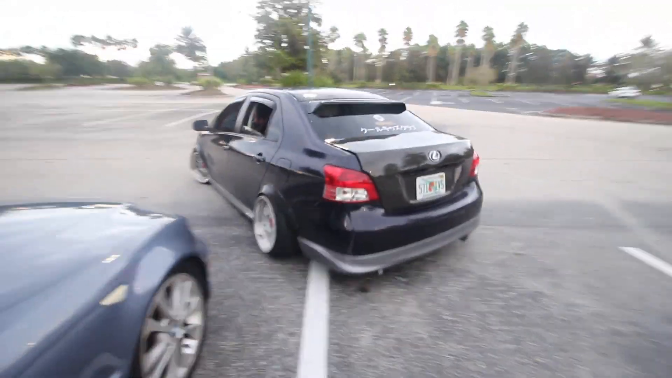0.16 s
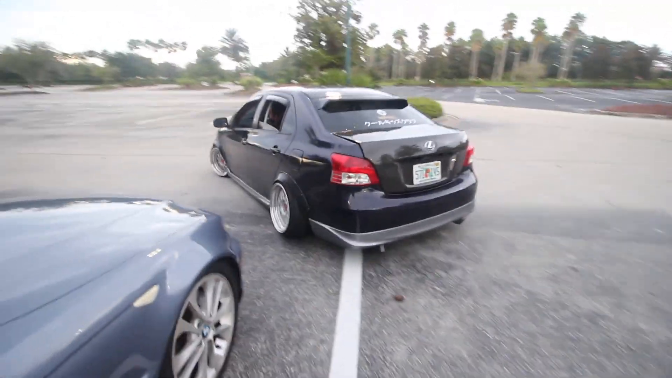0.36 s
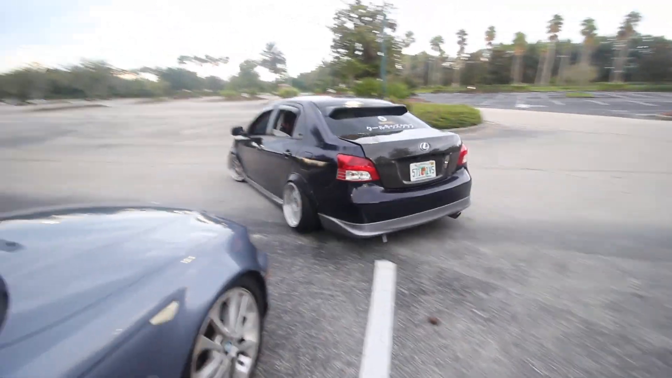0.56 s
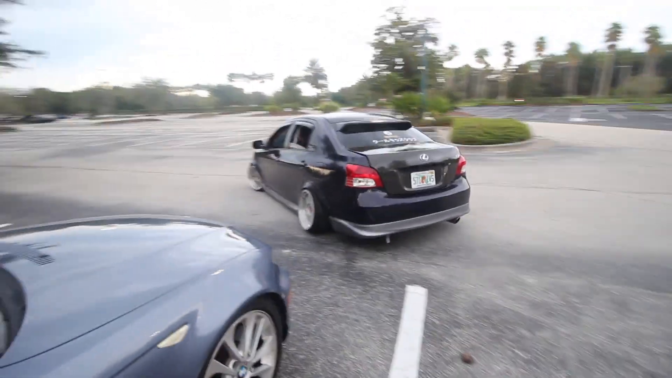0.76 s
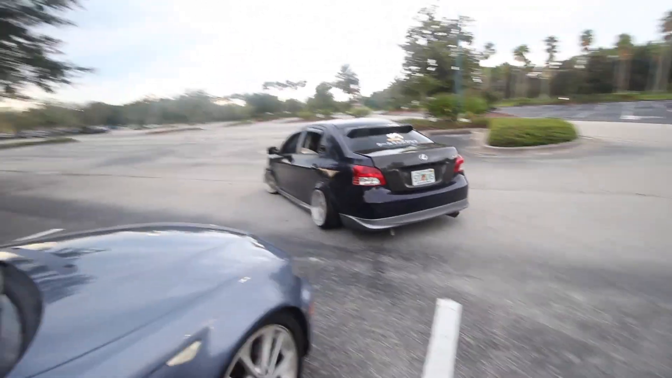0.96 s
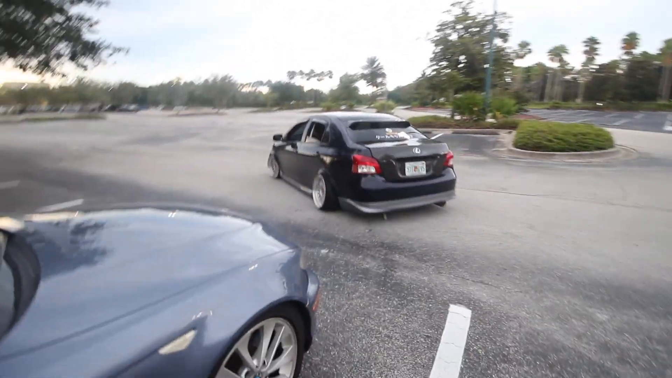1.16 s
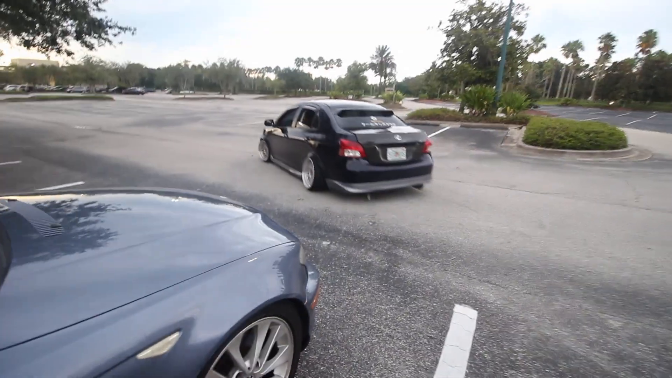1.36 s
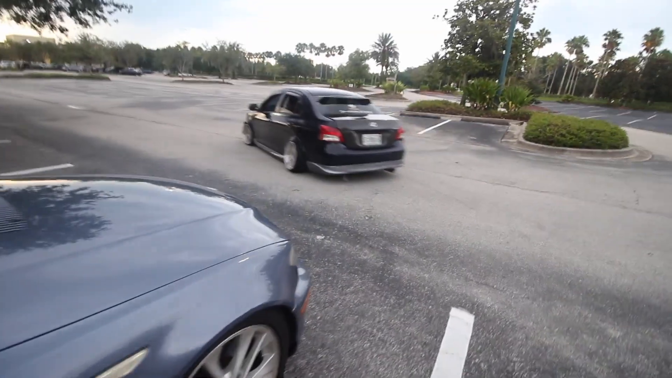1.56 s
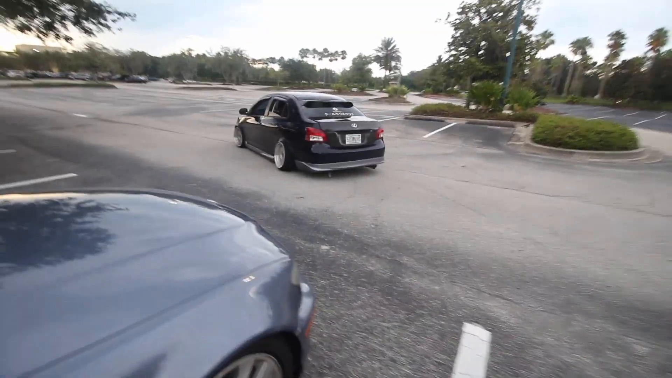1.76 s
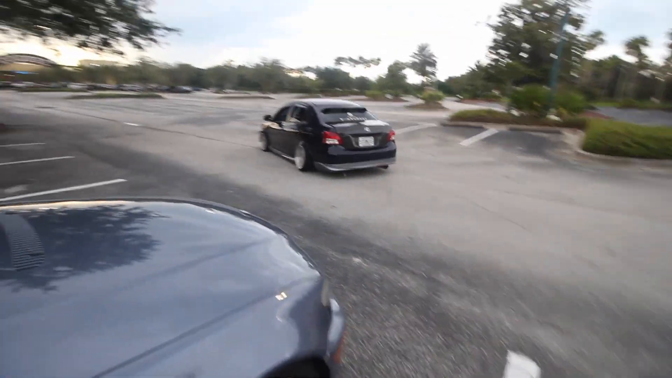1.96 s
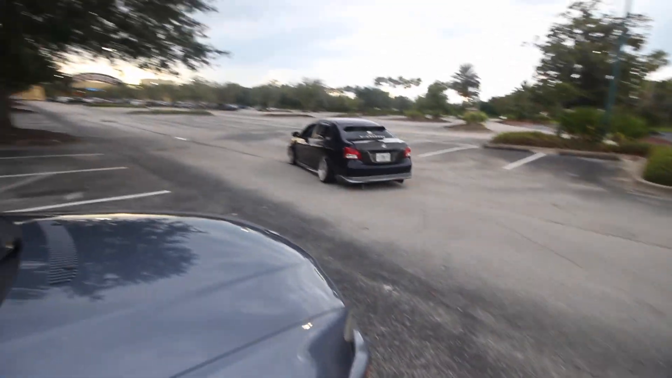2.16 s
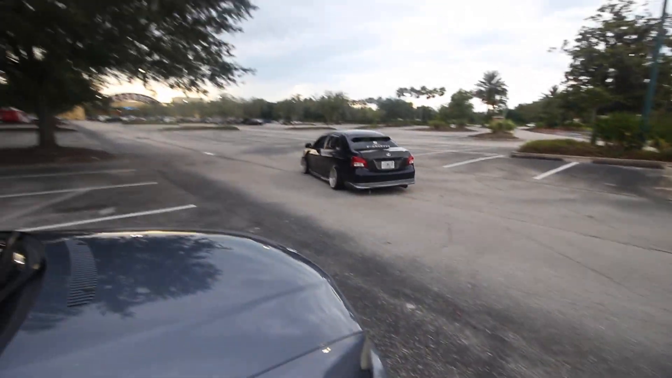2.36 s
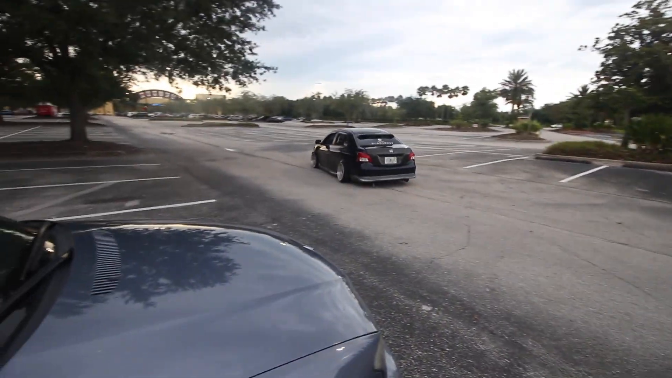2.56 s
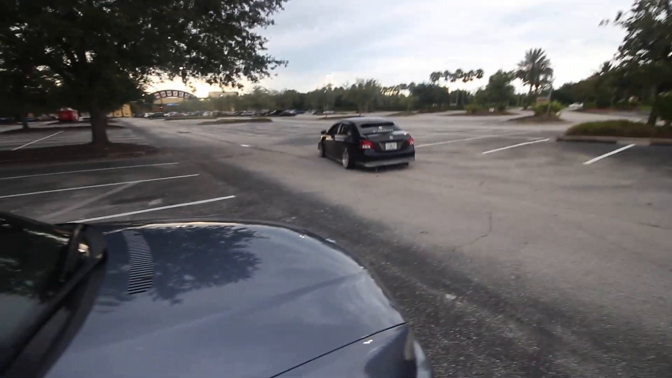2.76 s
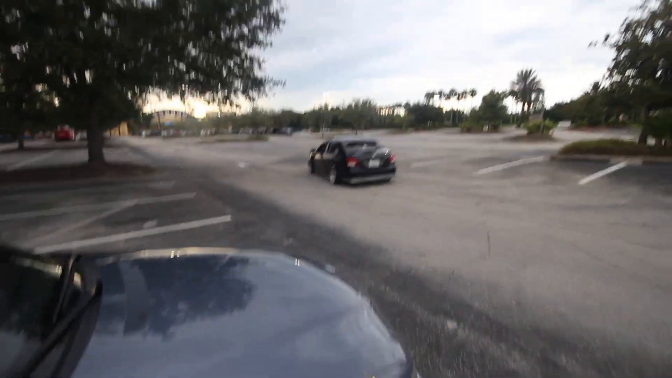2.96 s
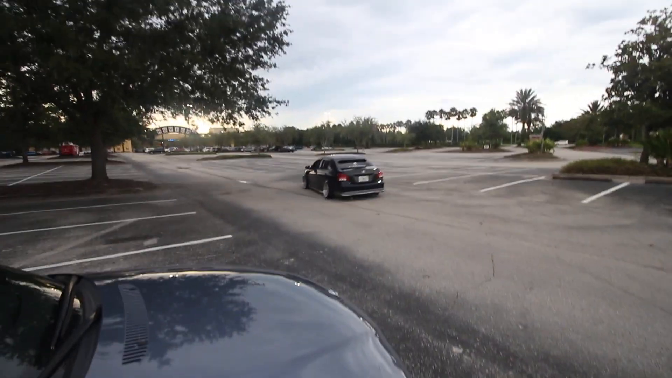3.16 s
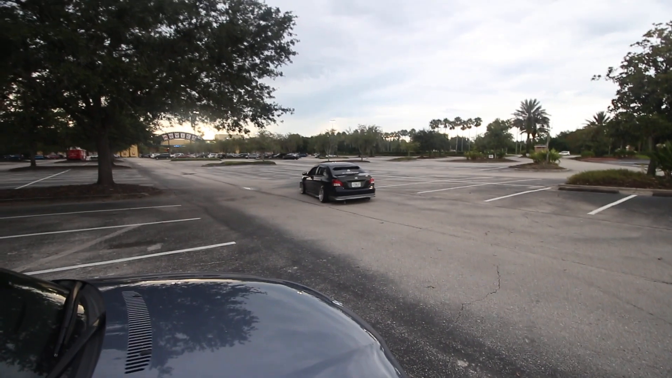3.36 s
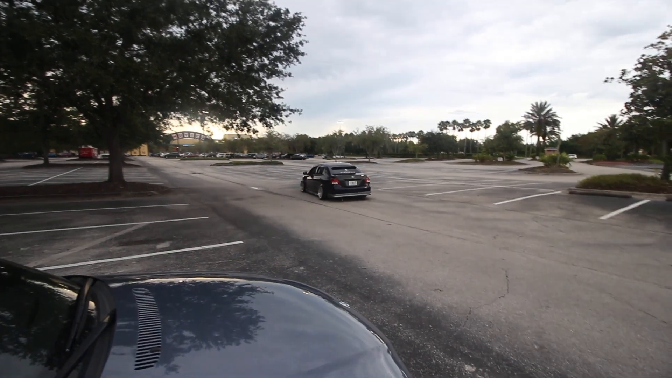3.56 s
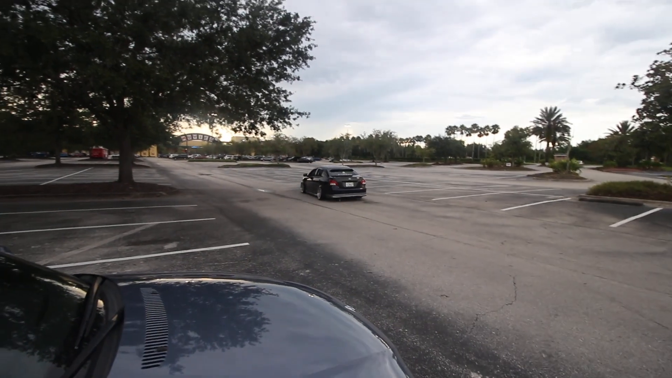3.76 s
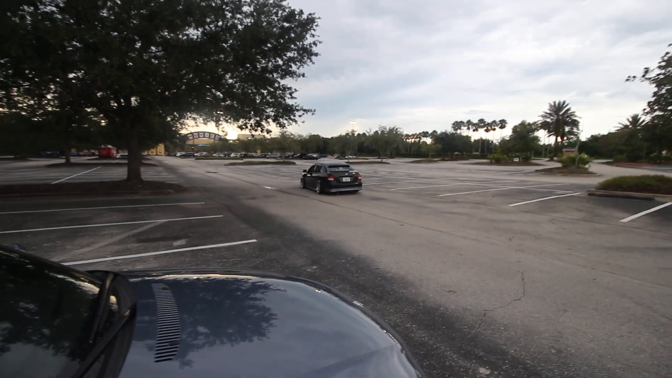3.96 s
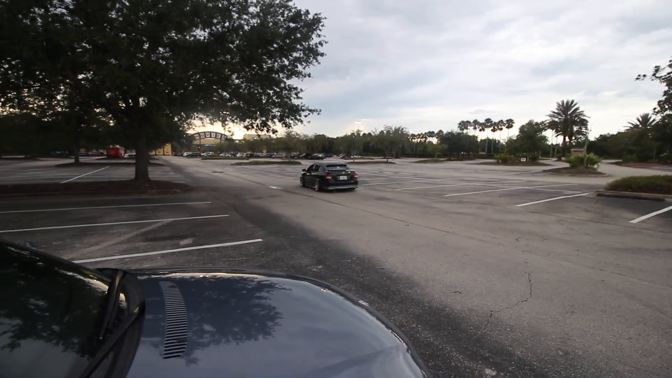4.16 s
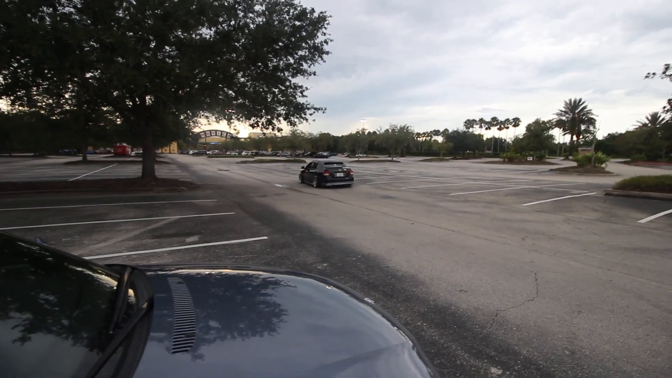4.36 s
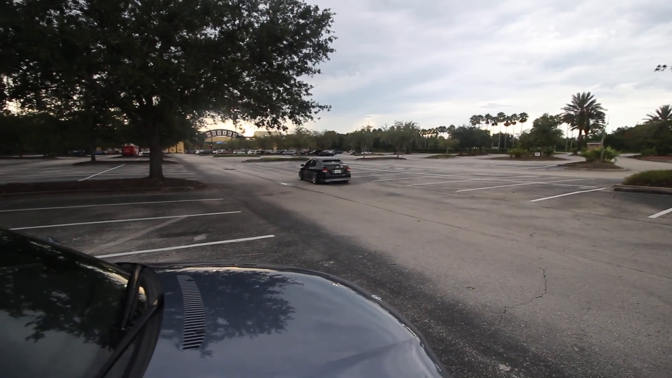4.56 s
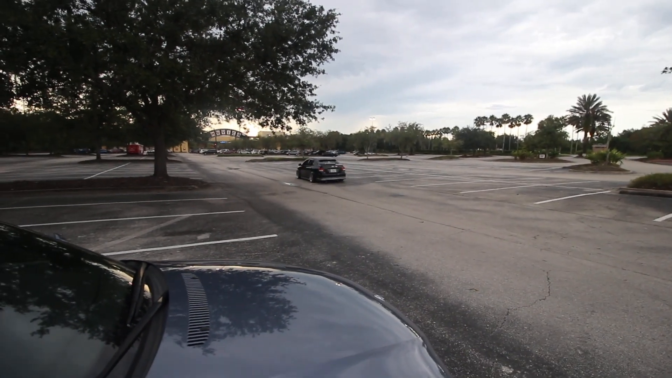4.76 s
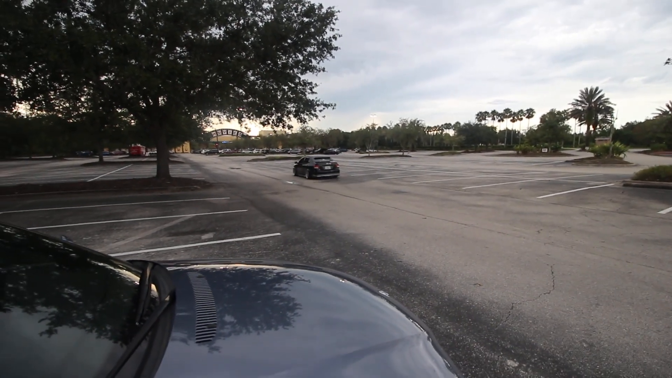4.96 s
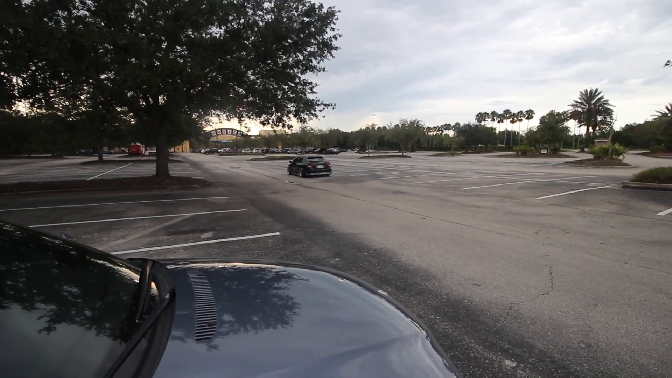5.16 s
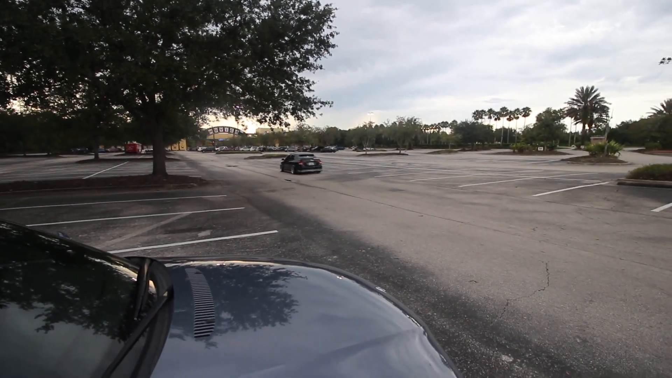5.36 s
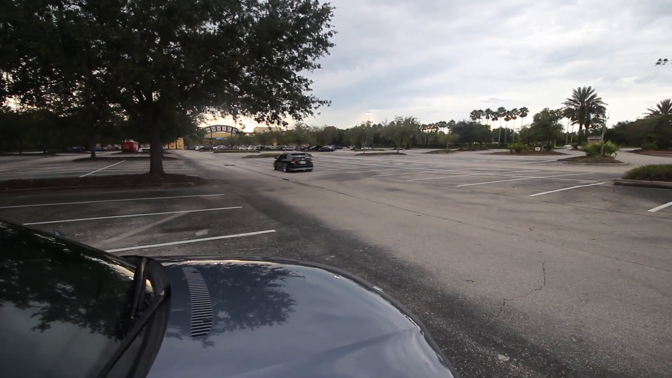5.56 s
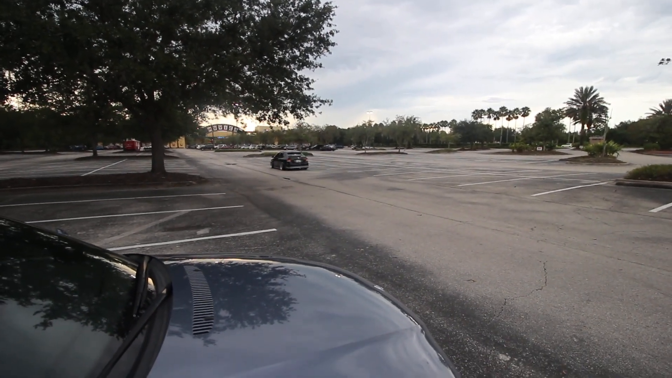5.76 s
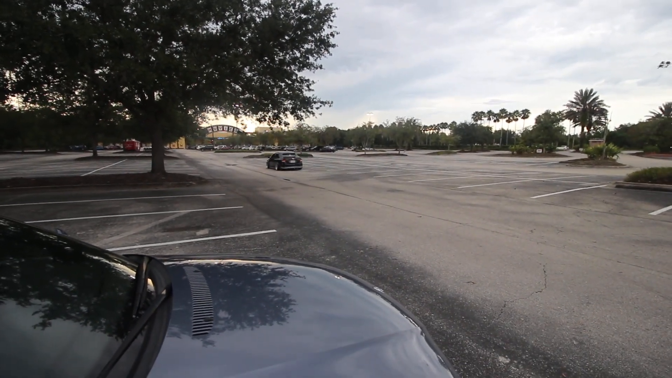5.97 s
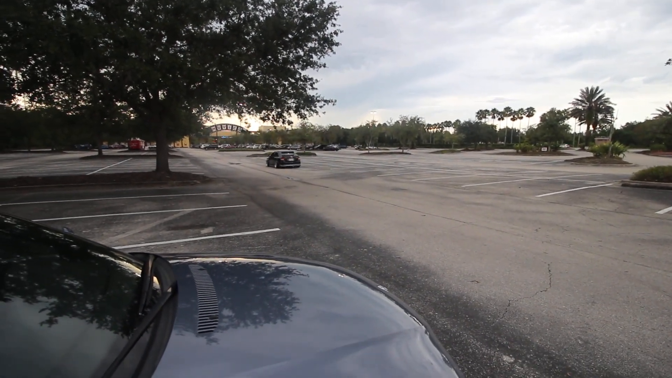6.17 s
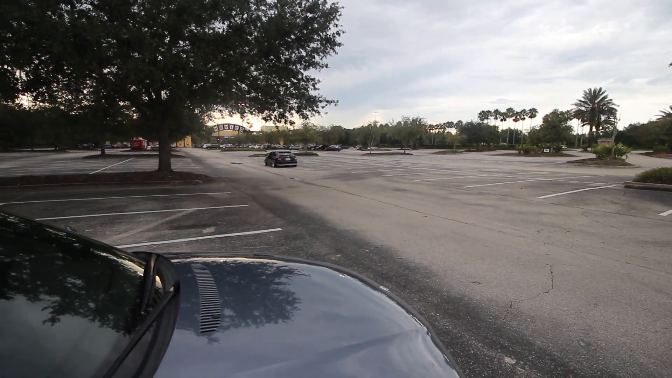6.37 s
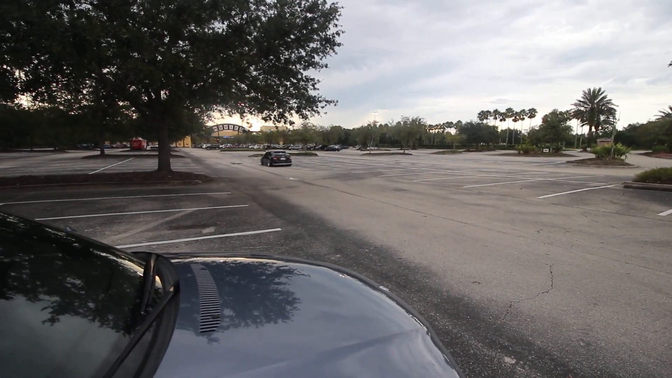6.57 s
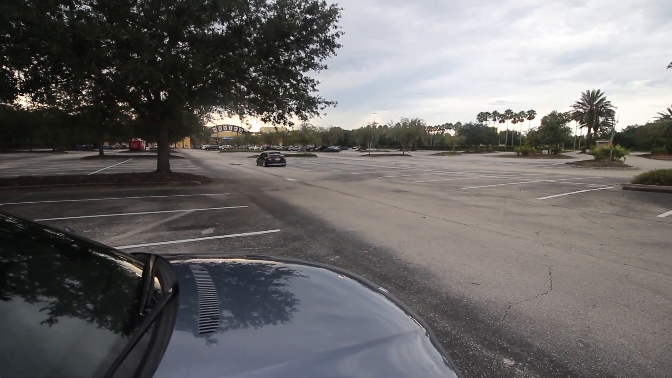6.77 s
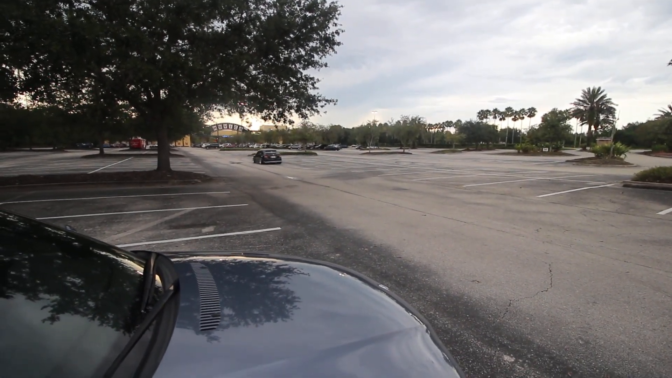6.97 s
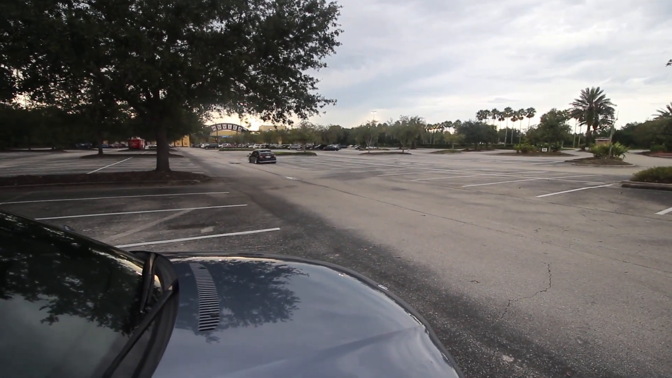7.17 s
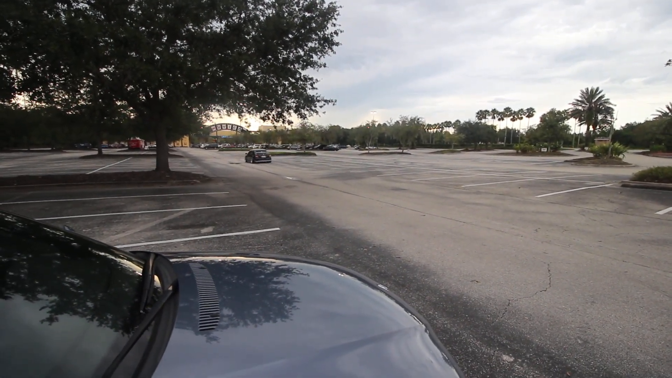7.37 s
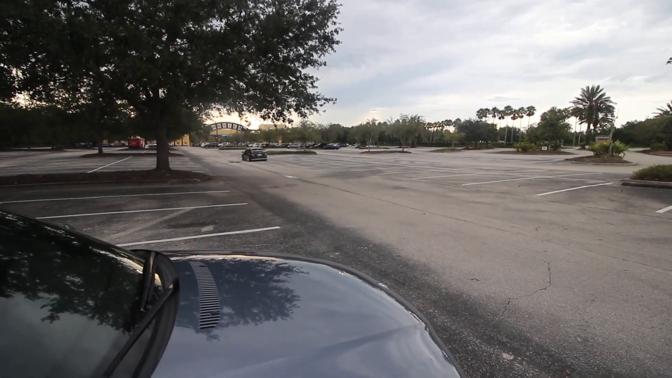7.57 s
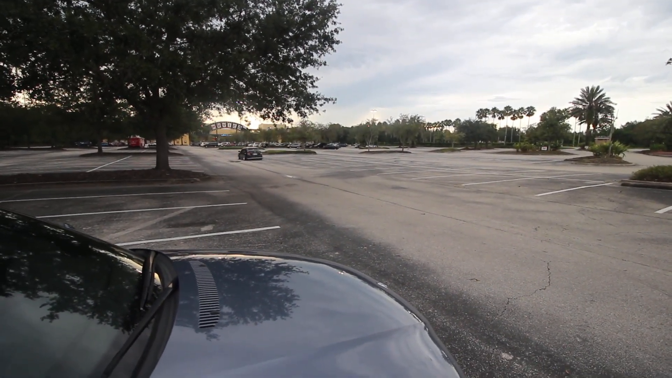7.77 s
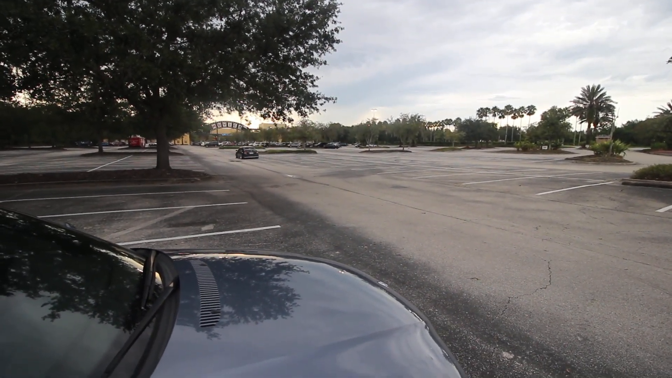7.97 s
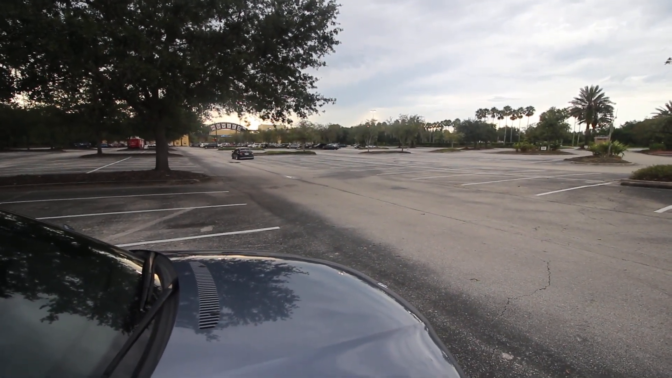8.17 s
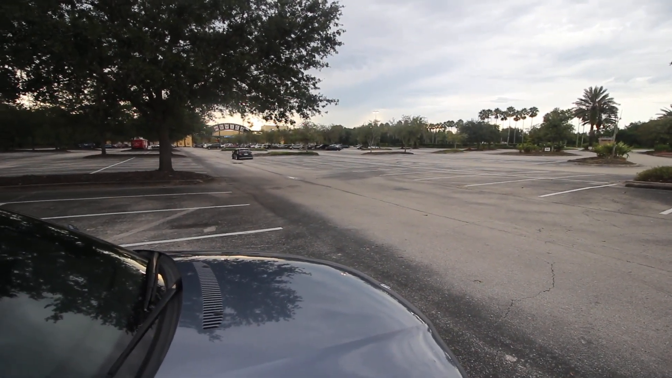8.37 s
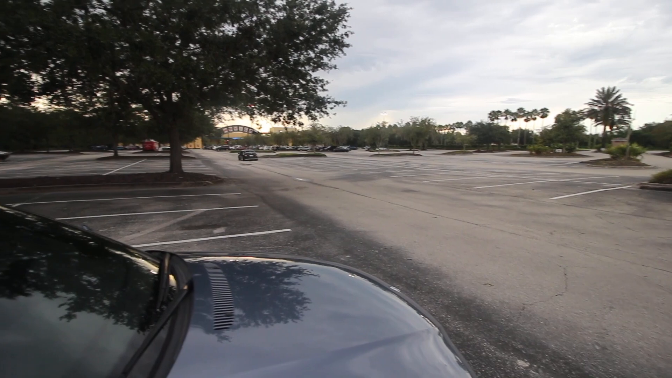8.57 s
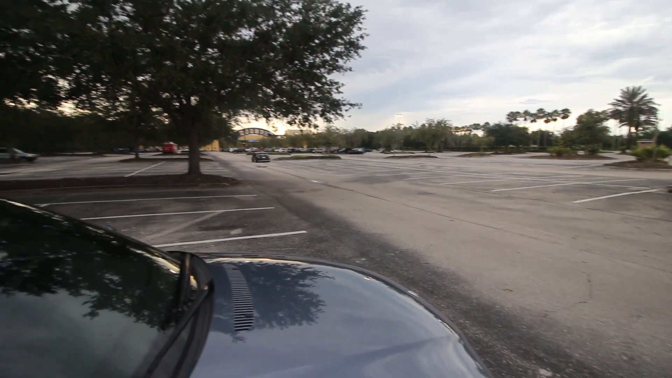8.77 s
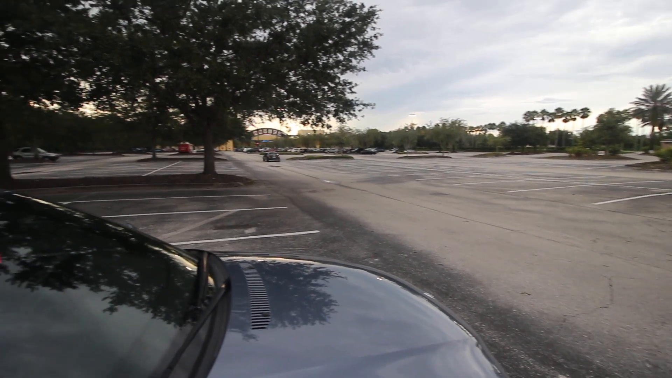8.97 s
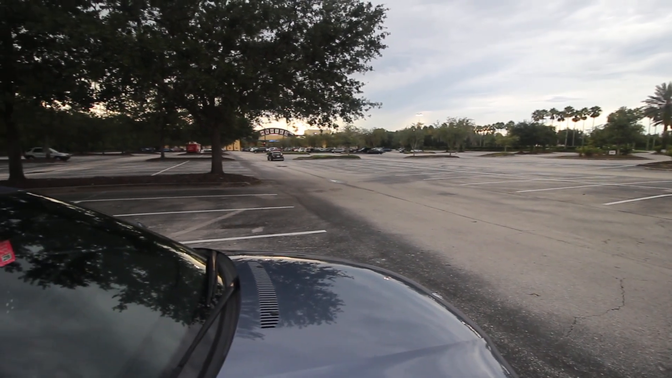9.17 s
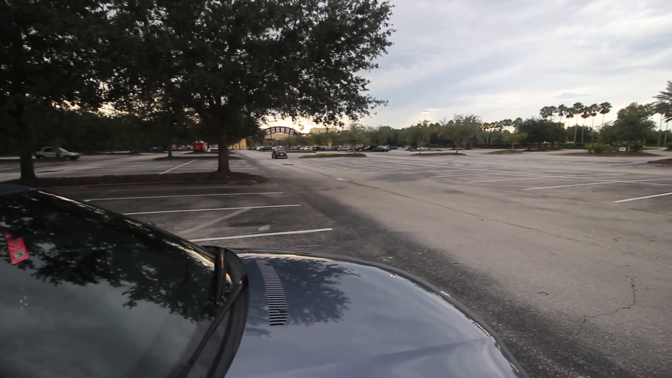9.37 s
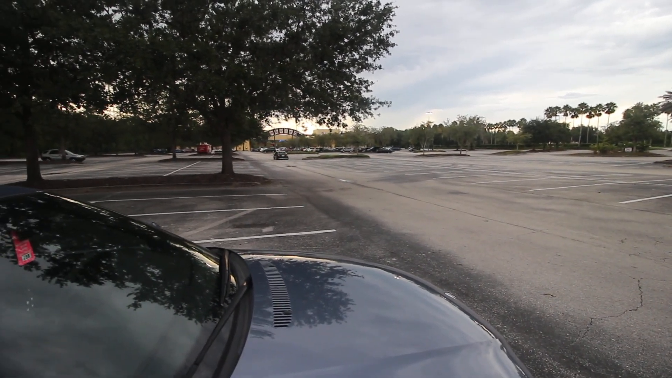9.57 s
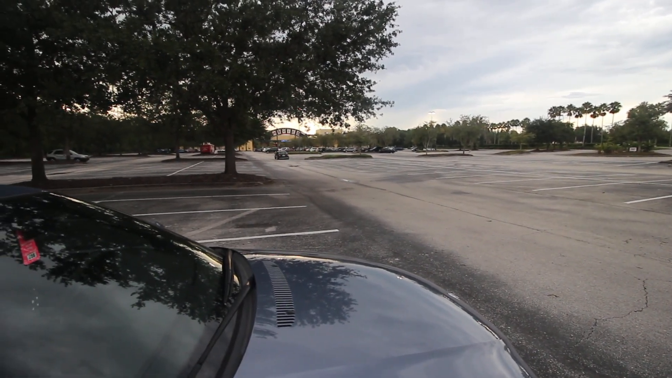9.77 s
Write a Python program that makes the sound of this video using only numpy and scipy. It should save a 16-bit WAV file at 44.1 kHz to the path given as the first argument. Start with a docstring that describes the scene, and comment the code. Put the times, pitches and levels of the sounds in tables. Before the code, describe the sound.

A small four-cylinder car with an open exhaust pulls away from close to the microphone in a parking lot. Its low, burbling drone climbs gradually, drops and coasts. Farther off it accelerates hard with a raspy bark, then lifts and gives one brief blip as the revs fall. Faint distant traffic and a light breeze lie underneath.

```python
"""The drone of a small four-cylinder car with an open exhaust, pulling away close to a stereo microphone
in a car park. It lifts, coasts, then accelerates hard far off, shifts and blips once. Each firing is a
pressure pulse that rings the pipe; under load its front steepens into a bark, a snap and a rasp.
Distant traffic lies below, and a light breeze stirs the leaves and rumbles on the microphone."""
import sys
import numpy as np
from scipy import signal
from scipy.fft import rfft, irfft, next_fast_len
from scipy.io import wavfile
from scipy.ndimage import uniform_filter1d

SR = 44100
rng = np.random.default_rng(int(sys.argv[2]) if len(sys.argv) > 2 else 0)


def put_to_file(sound):
    """Save the sound as 16-bit audio at rate SR, in the file named by the first command-line argument."""
    columns = np.atleast_2d(sound).T  # one column per channel
    safe = np.clip(columns, -1, 1)
    whole_steps = np.round(safe * 32767)
    wavfile.write(sys.argv[1], SR, whole_steps.astype(np.int16))


N = 432621

# spectrum of wind and far traffic: pitch_hz, relative_db
AIR_SPECTRUM = [(25, -29.5), (60, -16.5), (200, 0), (400, -12), (700, -16.5), (950, -18), (1150, -29.5),
                (1600, -32.5), (2500, -35.5), (6000, -50.5), (12000, -69)]
# that background swells and sinks: time_s, level_db
AIR_LEVEL = [(0, -44), (.9, -40), (1.6, -37.5), (3.3, -39), (5, -39.5), (6, -34.5), (9, -42), (9.81, -36)]
# how alike it is at the two capsules: pitch_hz, correlation
AIR_CORRELATION = [(30, 0.58), (1000, 0.99), (4000, 1), (12000, 0.44)]
# the breeze comes and goes: time_s, rumble_db, hiss_db
BREEZE_LEVELS = [(0, -43, -84), (1, -66, -73), (3, -66, -68.5), (4.9, -80.5, -73), (5.3, -51, -65),
                 (5.7, -52.5, -59), (6.1, -39.5, -63), (6.6, -47, -60), (8.9, -64, -83), (9.3, -57, -73),
                 (9.81, -41, -58)]
# engine speed: time_s, firing_hz
FIRING_RATE = [(0.0, 43.75), (0.16, 42.49), (0.34, 41.03), (0.6, 43.1), (0.75, 37.0), (0.81, 36.79),
               (0.99, 40.61), (1.23, 46.74), (1.56, 49.44), (1.76, 51.12), (2.49, 55.18), (2.79, 58.35),
               (3.09, 59.67), (3.2, 58.04), (3.4, 48.81), (3.6, 43.3), (3.8, 43.22), (4.1, 44.43),
               (4.41, 45.61), (4.78, 46.63), (5.2, 44.11), (5.53, 42.92), (5.72, 43.36), (6.19, 48.46),
               (6.48, 55.9), (6.63, 58.04), (6.9, 60.68), (7.17, 63.34), (7.5, 65.11), (7.92, 67.34),
               (8.26, 69.62), (8.5, 72.01), (8.76, 75.29), (8.83, 73.54), (9.06, 65.5), (9.29, 64.93),
               (9.37, 62.48), (9.58, 55.52), (9.76, 48.77), (9.81, 47.8)]
# strength of the four firings in turn: relative_db
CYLINDERS = [0.91, -1.8, -0.68, -2.5]
# strength of the pulses behind the drone: time_s, gain_db
DRONE_DRIVE = [(0, .5), (.3, .9), (.6, 2), (.76, 4), (.84, 1.5), (1.0, 4.5), (1.2, 3), (1.5, 3.2),
               (2.1, 4.5), (2.8, 2), (3.15, .2), (3.3, 2), (3.55, 1.2), (4.1, 1.1), (4.8, 1.1), (5.4, -1.5),
               (5.52, -5), (5.85, 1.1), (6.3, 7), (6.6, 3), (6.9, 1.1), (7.2, -1.3), (8, 1.5), (8.8, -7),
               (9.0, -9), (9.355, -19), (9.365, -7), (9.6, -2.1), (9.81, -3)]
# what the pipe lets out: pitch_hz, part_throttle_db, full_throttle_db
PIPE_RESPONSE = [(72.4, -46.5, -58), (96, -53.5, -43), (111.4, -46, -44.5), (128.7, -33.5, -28.5),
                 (152.7, -37, -37), (174.9, -24, -27.5), (196, -24, -36.5), (200, -25, -39),
                 (215.8, -40, -38), (241, -34, -51), (251.3, -33.5, -30.5), (267.9, -29.5, -40.5),
                 (285.8, -45.5, -32.5), (305, -36.5, -29.5), (343, -48, -38.5), (356, -35, -40),
                 (458, -40.5, -21.5)]
# the firing rate's own tone, weak at low speed: firing_hz, level_db
FUNDAMENTAL_LEVEL = [(42, -67), (59, -50.5), (74, -43.5)]
# harmonics 2 to 7 of the pulse: gain_db
HARMONICS = [4.5, 7, 5.5, 2.05, -2.5, -8.5]
# their balance shifts as the car moves off: time_s, third_db, fourth_db, fifth_db, sixth_db, seventh_db
HARMONIC_SHIFTS = [(0, -2, 1.5, 0, 5, 17), (.2, -1, 2.5, -6.5, -3.5, 18), (.36, -0.5, 1, -1, -6.5, 5),
                   (.7, -1.5, -0.5, -0.5, -2, 0), (1.1, -0.5, -0.5, 2.5, 2, 10.5),
                   (1.7, 2, 0, -7.5, -4, 4.5), (2.1, -0.5, 4, -1.5, -0.5, -4), (2.6, 1.5, -1, 1.5, 4, -1.5),
                   (3.1, 1.5, -5, -3.5, 3.5, -7.5), (3.7, 0, 1.5, 0.5, -2, 6.5), (4.5, -1, -1, -1, -1, 6),
                   (5.5, 0.5, 1, 4, 2, 0.5), (6.3, -1.5, -2.5, -1.5, 6.5, -3.5), (7, 1.5, -2.5, 3, -5, 7.5),
                   (7.8, -1, 4, 0.5, 0, -8), (8.6, -1, 3.5, 1, -4, -4.5), (9.3, 0.5, 2, -2.5, 0.5, -6),
                   (9.81, 1.5, -1.5, 0, -2.5, 7)]
# resonances rung by uneven firing: pitch_hz, width_hz, relative_db
BURBLE_MODES = [(176, 23, 4.5), (284.8, 35, 0)]
# the firing grows more or less uneven: centre_s, half_width_s, gain_db
BURBLE_BUMPS = [(.71, 0.07, 8), (1.02, 0.024, -5), (2.3, .4, 4.5), (9.43, .08, -5), (9.78, 0.053, 10)]
# steepness of the pulse front: time_s, low_bark_db, upper_bark_db, rasp_db
STEEPNESS = [(0.0, -32, -58, -62), (0.12, -30.5, -49, -63.5), (0.27, -42.5, -56, -69.5),
             (0.6, -41.5, -50, -68.5), (0.68, -41, -59, -57), (0.84, -54, -59, -68),
             (0.97, -40.5, -56, -59.5), (1.08, -36, -42, -57), (1.5, -36, -39, -61),
             (1.95, -38, -38, -63.5), (2.24, -29, -33.5, -61.5), (2.53, -37.5, -40.5, -64),
             (3.11, -41, -33.5, -70), (3.25, -38, -43.5, -71), (3.31, -42.5, -34.5, -68.5),
             (3.63, -31, -40, -69.5), (4.0, -31.5, -35, -65), (5.1, -36.5, -42, -62),
             (5.55, -41, -48.5, -61), (6.1, -30.5, -39, -55.5), (6.33, -26.5, -27.5, -46),
             (6.8, -30, -28, -46.5), (6.94, -28.5, -24.5, -44), (7.4, -33, -24.5, -44),
             (7.75, -30, -27.5, -42.5), (8.2, -27, -24, -41.5), (8.6, -36.5, -27.5, -49),
             (8.81, -32, -29, -52.5), (8.84, -40, -34, -55.5), (8.9, -28.5, -33.5, -53.5),
             (9.15, -49.5, -46, -70), (9.355, -60, -55, -71), (9.363, -46, -36.5, -65),
             (9.44, -37, -36, -65), (9.53, -25.5, -29, -66), (9.62, -39.5, -36.5, -64),
             (9.7, -44, -43, -61.5), (9.81, -34, -39.5, -61)]
# it changes for a few firings: centre_s, half_width_s, gain_db
STEEPNESS_BUMPS = [(.67, 0.015, 4), (.765, 0.013, 9), (6.3, 0.037, 2), (6.43, 0.042, 2.5),
                   (9.66, 0.0067, 5), (9.76, .01, -2)]
# off throttle the fronts soften: centre_s, half_width_s, share_lost
SOFTENINGS = [(.42, .13, .5), (5.6, 0.55, 0.97), (9.2, 0.2, 0.86)]
# the pulse runs up the pipe and comes out again: delay_s, gain_db
PULSE_RETURNS = [(.007, -15.5), (.011, -16)]
# the steep front comes back weaker: delay_s, gain_db
STEEP_RETURNS = [(.0068, -11.5)]
# low, middle and high group of pipe resonances: pitch_hz, width_hz, part_throttle_db, full_throttle_db
BARK_GROUPS = [
    [(321, 54, 10, 7.5), (323.7, 54, 13.5, 4), (441.2, 31, 9.5, 13)],
    [(472.4, 38, 3.5, 0), (541, 68, 5.5, -8), (616.5, 64, -2, 2.5)],
    [(681.5, 81, 8, 6.5), (840, 140, 5.5, 4.5), (896, 110, -17, -12)],
]
# how the middle and high group follow the upper bark: base_db, swing_ratio, full_throttle_db
BARK_TRACKING = [(-30.5, 1.15, -3.5), (-38.5, 1.28, 5)]
# colour of the bark: time_s, low_group_top_db, middle_group_top_db, whole_high_group_db
BARK_COLOUR = [(0, -1.5, -6, -5.5), (.6, -1, 0, -6), (1.1, -6.5, -2, -1), (1.7, 0, -3.5, -0.5),
               (2.2, -1, -0.5, 4), (3, 0.5, 4, -3), (3.7, 2.5, -1.5, 2.5), (4.5, -1, 1, 5.5),
               (5.3, 2, -2, 8), (6.2, -2.5, -2.5, 3.5), (6.7, -1, 1.5, -5.5), (7.4, 2, 0.5, 0),
               (8.1, -9, -5, -2), (8.7, 11, 6, 3), (9.3, 4, -6, -0.5), (9.81, -5, -2, -4)]
# resonances of the snap: pitch_hz, width_hz, relative_db
SNAP_RESONANCES = [(1275, 250, 7.5), (1554, 85, 1), (1775, 40, -2), (2350, 300, -17)]
# colour of the snap: time_s, whole_db, upper_two_db
SNAP_COLOUR = [(0, 3.5, 11.5), (1.2, -7.5, -14), (2.2, -3.5, -4.5), (3.3, 1, -12), (4.5, -1.5, -12),
               (5.5, 0.5, 6), (6.4, -1.5, -14), (7.3, -4, -1.5), (8.3, 0, -3), (8.75, 8, -3), (8.9, -2, -1),
               (9.81, 0, 4)]
# resonances of the rasp: pitch_hz, width_hz, relative_db
RASP_RESONANCES = [(2980, 170, 13), (3363, 590, 14.5), (4095, 780, 16), (4810, 780, -0.5),
                   (6000, 260, -7.5), (7740, 990, -8.5), (10700, 3200, -18.5)]
# the rasp's bright bands shift as the car moves away: time_s, lowest_db, third_db, fourth_db, top_db
RASP_COLOUR = [(0, -4, -10, -10, -4), (.55, 11, -15.5, -13.5, 3.5), (.8, 13.5, -18, -13, -4),
               (1.05, -2, -10, -8, -11.5), (1.3, -3.5, -6, -3.5, -11), (1.55, -11, -3.5, 1, -11.5),
               (1.8, -12, -1, 2.5, -3.5), (2.3, -11, -1.5, 12, -11.5), (2.8, 0.5, -1, 17.5, -9),
               (3.1, -0.5, 3.5, 19.5, -5.5), (3.7, -9, -18.5, -13.5, 13), (4.5, -12.5, -18, -5.5, 1.5),
               (5.4, 7, -19, -9.5, -3.5), (6.3, -9, -8, -2, -4), (7.3, -14, -5, 6.5, 1),
               (8.2, -14, 6.5, 7, 9.5), (8.8, -12, -0.5, 5, 4), (9.81, 1, -6, -5, -8)]
# bands the pipe swallows: pitch_hz, width_hz, share_lost
PIPE_NOTCHES = [(1030, 600, 0.75), (2625, 1500, 0.65)]
# reflections off kerbs, cars and trees: delay_s, gain_db
CAR_PARK_ECHOES = [(0.045, -26.5), (0.101, -23.5)]
# the left capsule is the more sensitive: pitch_hz, left_minus_right_db
CAPSULE_BALANCE = [(60, 8.9), (400, 8.9), (1000, 7.5), (2500, 7.5), (5000, 8.5), (7500, 3), (12000, 2)]

PIPE_HZ, PIPE_WIDTH_HZ = 184.5, 18   # main resonance of the pipe
FULL_THROTTLE_S, OPENING_S = 6.1, 0.25   # the throttle starts to open fully; time it takes
NEAR_DB, RECEDE_S = 3.5, 1.9   # the second harmonic is fuller close to the microphone, then fades
SWELL_HZ, SWELL_DB = 539.5, 1   # at part throttle the middle bark swells as a harmonic crosses this pitch
SECOND_BEAT_S, SECOND_BEAT_SHARE = .0064, .34   # at full throttle, a return that alternates in sign
BARK_AT_S, SNAP_AT_S, RASP_AT_S = .0004, .0005, .0002   # delays after each firing
BARK_MEAN_DB, SNAP_DB, SNAP_BARK_SHARE, BURBLE_TRIM_DB = -34, 4.5, .45, -10
TIME_S = np.arange(N) / SR


def from_db(db):
    """Decibels to gain."""
    return 10 ** (np.asarray(db) / 20)


def in_time(rows):
    """Columns of a curve table, one value a sample."""
    times, *columns = np.transpose(rows)
    return [np.interp(TIME_S, times, column) for column in columns]


def at_hz(rows, hz, column=1):
    """A spectrum read on a log-frequency axis."""
    rows = np.array(rows)
    return np.interp(np.log(hz), np.log(rows[:, 0]), rows[:, column])


def bumps(rows):
    """Brief bell-shaped rises and dips, summed."""
    return sum(size * np.exp(-((TIME_S - centre) / width) ** 2) for centre, width, size in rows)


def evened(x):
    """Level held at rms 1 over about a sixth of a second."""
    power = uniform_filter1d(uniform_filter1d(x ** 2, size=5000), size=5000)
    return x / np.sqrt(np.maximum(power, 0) + 1e-16)


def cut(x, hz, kind, order=4):
    """Butterworth high- or low-pass."""
    return signal.sosfilt(signal.butter(order, hz, kind, fs=SR, output="sos"), x)


def modes(x, table, sign=1):
    """Parallel resonances; in step they leave deep valleys between, alternating in sign they blend."""
    out = 0
    for k, (hz, width_hz, level_db) in enumerate(table):
        r = np.exp(-np.pi * width_hz / SR)
        b = (1 - r * r) / 2 * np.array([1, 0, -1])
        a = [1, -2 * r * np.cos(2 * np.pi * hz / SR), r * r]
        out = out + sign ** k * from_db(level_db) * signal.lfilter(b, a, x + 1e-18)
    return out


def repeats(x, table):
    """The sound plus delayed, weaker copies."""
    out = x.copy()
    for delay, level_db in table:
        lag = round(delay * SR)
        out[..., lag:] += from_db(level_db) * x[..., :N - lag]
    return out


def clicks(at, sizes):
    """A train of clicks, each shared between the two nearest samples."""
    whole = np.clip(at.astype(int), 0, N - 2)
    part = at - whole
    return np.bincount(whole, sizes * (1 - part), N) + np.bincount(whole + 1, sizes * part, N)


def bursts(fronts, decay_s, steady, spread):
    """Stereo noise that leaps up with each front and dies away, over a steady part."""
    gate = signal.lfilter([1], [1, -np.exp(-1 / (decay_s * SR))], fronts)
    return (gate + steady) * (rng.standard_normal(N) + spread * rng.standard_normal((2, N)))


def scatter(at):
    """One bounded random value a firing."""
    return np.clip(rng.standard_normal(len(at)), -2.3, 2.3)


def waver(depth_db=2, per_s=9):
    """Moving air between car and microphone: a slow random swing in dB."""
    return depth_db * np.interp(TIME_S * per_s, np.arange(100), rng.standard_normal(100))


def distant_air():
    """Wind and traffic far beyond the car park: shaped noise, widest in the low bass and top treble."""
    hz = np.maximum(np.fft.rfftfreq(N, 1 / SR), 10)
    mid, side = rfft(rng.standard_normal((2, N))) * from_db(at_hz(AIR_SPECTRUM, hz))
    alike = at_hz(AIR_CORRELATION, hz)
    pair = irfft(np.sqrt(1 + alike) * mid + np.sqrt(1 - alike) * side * [[1], [-1]], N)
    return from_db(in_time(AIR_LEVEL)[0]) * pair / np.sqrt(np.mean(pair ** 2))


def breeze():
    """Rumble right on the microphone and a wide, smooth hiss in the leaves around it."""
    rumble_db, hiss_db = in_time(BREEZE_LEVELS)
    rumble = evened(cut(cut(rng.standard_normal(N), 210, "low"), 45, "high"))
    leaves = rng.standard_normal(N) + rng.standard_normal((2, N))
    hiss = cut(cut(leaves, 900, "high", order=1), 5200, "low", order=1)
    return from_db(rumble_db) * rumble + from_db(hiss_db) * hiss


def throttle():
    """0 at part throttle, 1 once it has opened fully."""
    return np.clip((TIME_S - FULL_THROTTLE_S) / OPENING_S, 0, 1)


def through_pipe(hz):
    """Gain of the pipe in dB, passing from its part-throttle to its full-throttle shape."""
    part_db, full_db = (at_hz(PIPE_RESPONSE, hz, column) for column in (1, 2))
    return part_db + throttle() * (full_db - part_db)


def burble(rate, at, drive_db):
    """Strong and weak firings alternate, which sounds as tones halfway between the harmonics."""
    uneven = clicks(at, (-1.) ** np.arange(len(at)) + .25 * scatter(at))
    ring = modes(uneven, BURBLE_MODES, sign=-1)
    ring = evened(cut(cut(ring, 130, "high"), 340, "low", order=6))
    pipe_gain = np.sqrt(sum(from_db(through_pipe(k * rate)) ** 2 for k in (3.5, 4.5, 5.5)))
    return from_db(drive_db + bumps(BURBLE_BUMPS) + BURBLE_TRIM_DB) * pipe_gain * ring


def steep_fronts(at, sizes):
    """The steep flank of each pulse and its return, softened while the car coasts."""
    firmness = 1 - np.clip(bumps(SOFTENINGS), 0, 1)
    return firmness * repeats(clicks(at, sizes), STEEP_RETURNS)


def rasp(fronts, at, turns, light_load):
    """Fronts and turbulence ring the treble resonances; every firing has a colour of its own."""
    gust = 4.5 * fronts + bursts(fronts, decay_s=.0012, steady=.055 + .035 * light_load, spread=.3)
    firing = np.clip(turns.astype(int), 0, len(at) - 1)
    lowest_db, third_db, fourth_db, top_db = in_time(RASP_COLOUR)
    colour_db = [lowest_db, 0, third_db, fourth_db, top_db, top_db, top_db]
    out = 0
    for k, (hz, width_hz, level_db) in enumerate(RASP_RESONANCES):
        flicker_db = (4.4 if k > 3 else 2.2) * scatter(at)[firing]
        struck = gust * from_db(level_db + colour_db[k] + flicker_db)
        band = [(hz, width_hz, 0)]
        out = out + modes(modes(struck, band), band)   # twice: steep skirts
    return evened(out)


def snap(fronts, light_load):
    """Fronts and puffs of noise ring the resonances between bark and rasp."""
    whole_db, upper_db = in_time(SNAP_COLOUR)
    puffs = (.035 + .05 * light_load) * bursts(fronts, decay_s=.003, steady=.4, spread=.2)
    resonances = [(hz, width_hz, db + (k > 1) * upper_db + waver())
                  for k, (hz, width_hz, db) in enumerate(SNAP_RESONANCES)]
    ring = modes(puffs - fronts, resonances)
    return from_db(whole_db) * evened(cut(cut(ring, 1000, "high", order=2), 3500, "low", order=2))


def bark_pulses(rate, turns, at, sizes):
    """Pressure pulses with a little gas noise and their returns along the pipe."""
    struck_at = at + BARK_AT_S * SR
    pulses = clicks(struck_at + .6 * scatter(at), sizes / sizes.mean())
    second_beat = clicks(struck_at + SECOND_BEAT_S * SR, (-1.) ** np.arange(len(at)))
    pulses -= SECOND_BEAT_SHARE * throttle() * second_beat
    # the drone carries the lowest seven harmonics, so they are taken out here
    lowest = sum(np.cos(2 * np.pi * k * (turns - BARK_AT_S * rate)) for k in range(1, 8))
    pulses -= rate / SR * (1 + 2 * lowest)
    gas = .011 * bursts(clicks(struck_at, sizes), decay_s=.008, steady=.3, spread=0)[0]
    return cut(repeats(gas - pulses, PULSE_RETURNS), 680, "low", order=2)


def bark(pulses, rate, low_db, upper_db):
    """The pulses ring three groups of pipe resonances, louder as the front steepens."""
    full = throttle()
    middle_db, high_db = (base_db + ratio * (upper_db - BARK_MEAN_DB) + full_db * full
                          for base_db, ratio, full_db in BARK_TRACKING)
    middle_db += SWELL_DB * np.cos(2 * np.pi * SWELL_HZ / rate) * (1 - full)
    low_top_db, middle_top_db, high_shift_db = in_time(BARK_COLOUR)
    levels_db = [low_db, middle_db, high_db + high_shift_db]
    out = 0
    for group, level_db, top_db in zip(BARK_GROUPS, levels_db, [low_top_db, middle_top_db, 0]):
        resonances = [(hz, width_hz, part_db + (full_db - part_db) * full + (k == 2) * top_db + waver())
                      for k, (hz, width_hz, part_db, full_db) in enumerate(group)]
        skirt = [(np.mean([row[0] for row in group]), 400, 0)]   # one wide band steepens the flanks
        out = out + from_db(level_db) * evened(modes(modes(pulses, resonances), skirt))
    return out


def drone(rate, turns, drive_db, low_bark_db):
    """Seven harmonics of the firing rate, each lagging as it would through the pipe resonance."""
    fundamental_db = np.minimum(at_hz(FUNDAMENTAL_LEVEL, rate), low_bark_db - 12)   # fades with the bark
    near_db = NEAR_DB * np.exp(-(TIME_S / RECEDE_S) ** 2)
    shifts_db = [near_db] + in_time(HARMONIC_SHIFTS)
    overtones_db = [drive_db + db + shifts_db[k - 2] + through_pipe(k * rate)
                    for k, db in enumerate(HARMONICS, 2)]
    out = 0
    for k, level_db in enumerate([fundamental_db] + overtones_db, 1):
        gain = from_db(uniform_filter1d(level_db, size=900))   # each harmonic's level glides over about 20 ms instead of stepping
        hz = k * rate
        lag = np.arctan2(hz * PIPE_WIDTH_HZ, PIPE_HZ ** 2 - hz ** 2)
        out = out + np.sqrt(2) * gain * np.sin(2 * np.pi * k * turns - lag)
    return out


def exhaust():
    """The open pipe: one pulse a firing drives every layer; the hard edge echoes round the car park."""
    rate, = in_time(FIRING_RATE)
    drive_db, = in_time(DRONE_DRIVE)
    low_db, upper_db, rasp_db = in_time(STEEPNESS) + bumps(STEEPNESS_BUMPS)
    snap_db = SNAP_DB + SNAP_BARK_SHARE * upper_db + (1 - SNAP_BARK_SHARE) * rasp_db
    light_load = np.clip((-48 - rasp_db) / 12, 0, 1)   # here the fronts sink into steady turbulence
    turns = np.cumsum(rate) / SR - .7   # one turn a firing, the first 0.7 of an interval in
    count = np.arange(int(turns[-1]) + 1)
    at = np.interp(count, turns, np.arange(N))   # sample position of each firing
    cylinder_db, vigour = np.array(CYLINDERS)[count % 4], scatter(at)
    pulse_sizes = from_db(1.3 * cylinder_db + .45 * vigour)
    front_sizes = from_db(cylinder_db + 1.4 * vigour)
    snap_fronts, rasp_fronts = (steep_fronts(at + s * SR, front_sizes) for s in (SNAP_AT_S, RASP_AT_S))
    edge = (bark(bark_pulses(rate, turns, at, pulse_sizes), rate, low_db, upper_db)
            + from_db(snap_db) * snap(snap_fronts, light_load)
            + from_db(rasp_db) * rasp(rasp_fronts, at, turns, light_load))
    for hz, width_hz, share in PIPE_NOTCHES:
        edge -= share * modes(edge, [(hz, width_hz, 0)])
    body = drone(rate, turns, drive_db, low_db) + burble(rate, at, drive_db)
    return body + repeats(edge, CAR_PARK_ECHOES)


def scene():
    """The car park from the microphone stand: far traffic, the breeze and the departing car."""
    return distant_air() + breeze() + exhaust()


def record(dry, hiss_db=-69, cutoff_hz=15500):
    """The stereo microphone: the left capsule is the more sensitive, each hisses, the top is cut."""
    size = next_fast_len(N + 4096)
    lean = from_db(at_hz(CAPSULE_BALANCE, np.maximum(np.fft.rfftfreq(size, 1 / SR), 10)))
    gains = np.array([lean, np.ones_like(lean)]) * 2 / (1 + lean)
    pair = irfft(rfft(dry, size) * gains, size)[:, :N]
    pair += from_db(hiss_db) * cut(rng.standard_normal((2, N)), 9000, "low", order=1)
    return signal.sosfilt(signal.cheby2(12, 70, cutoff_hz, fs=SR, output="sos"), pair)


dry = scene()
out = record(dry)
put_to_file(out)
```